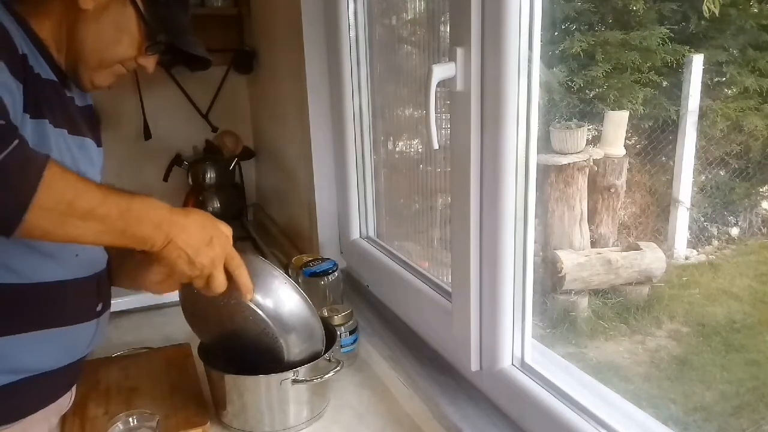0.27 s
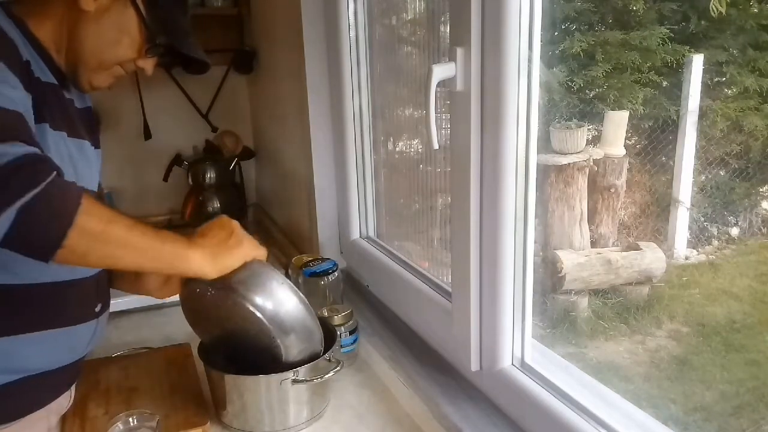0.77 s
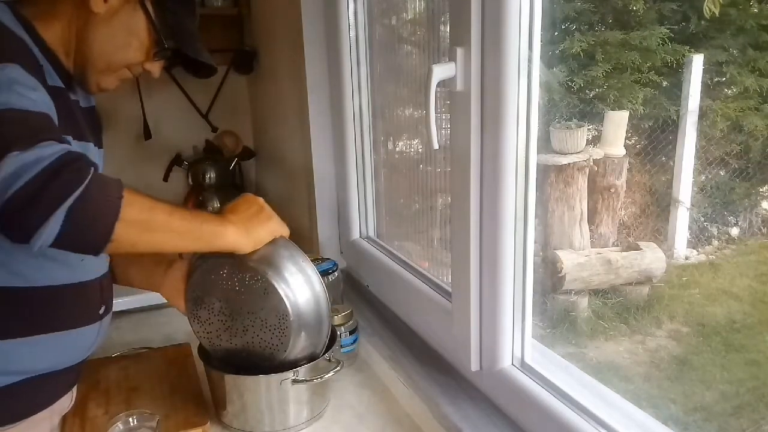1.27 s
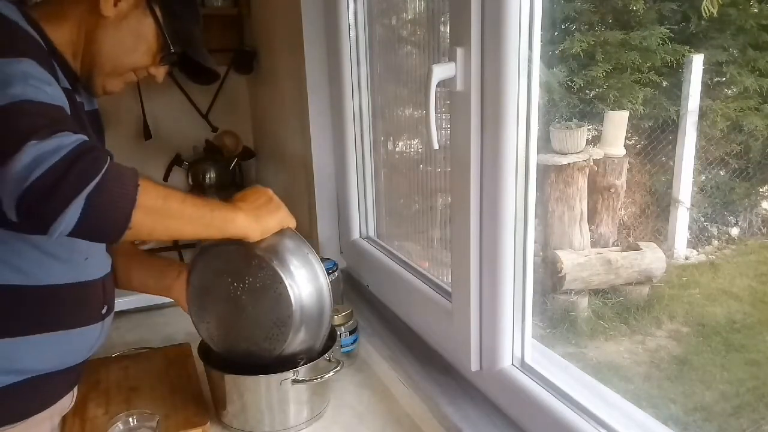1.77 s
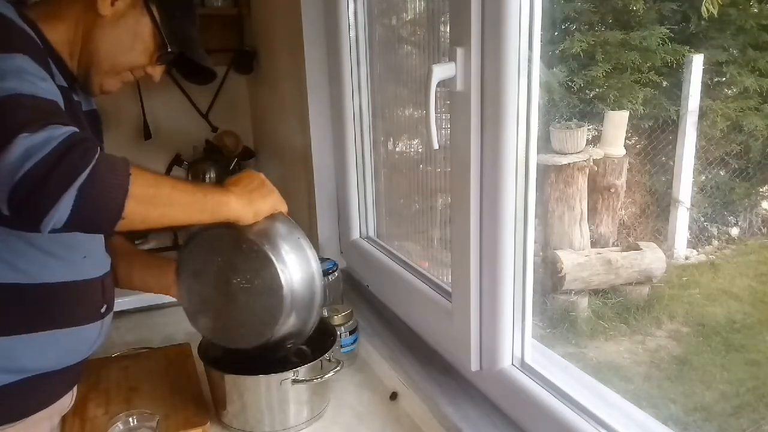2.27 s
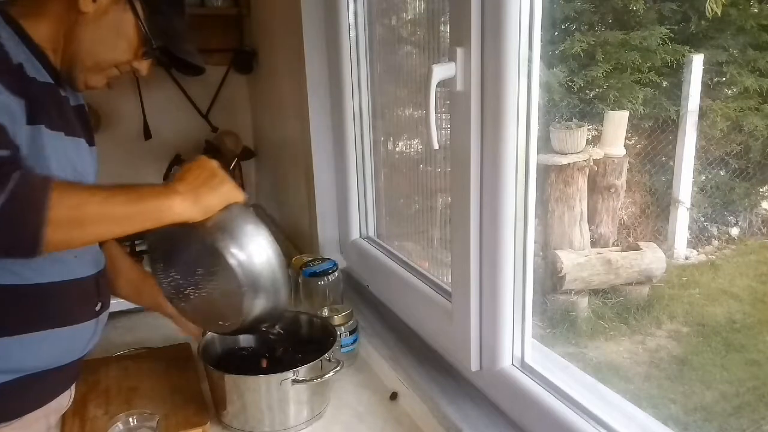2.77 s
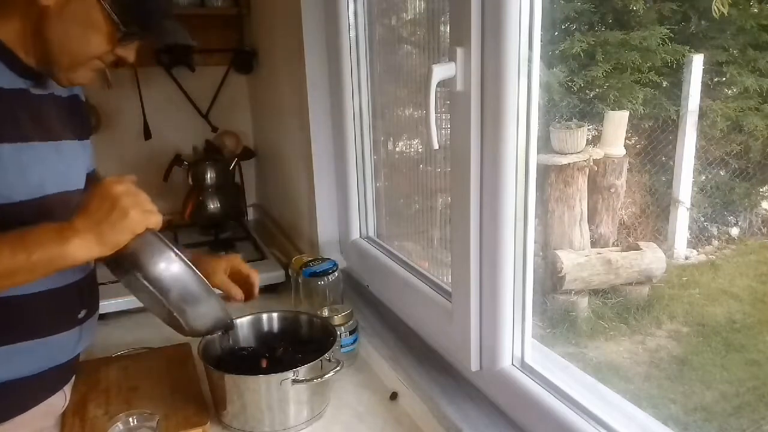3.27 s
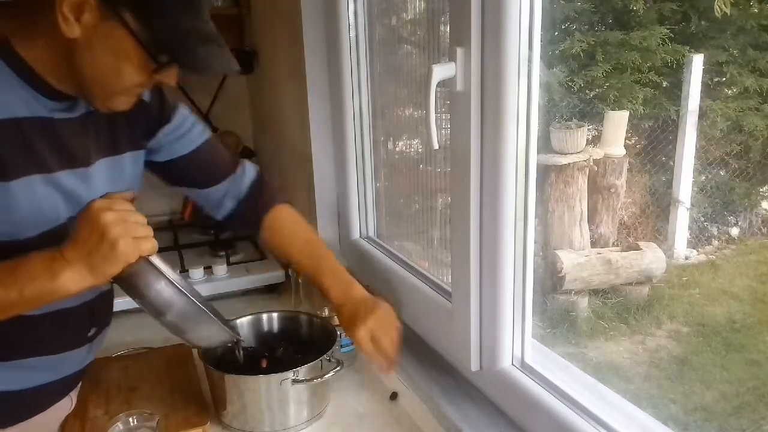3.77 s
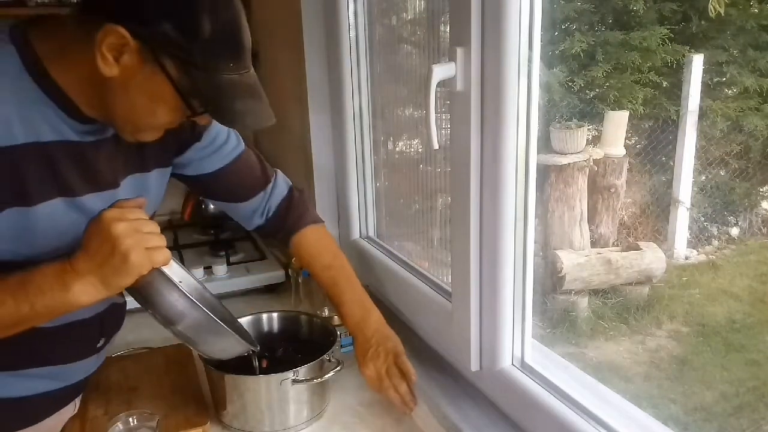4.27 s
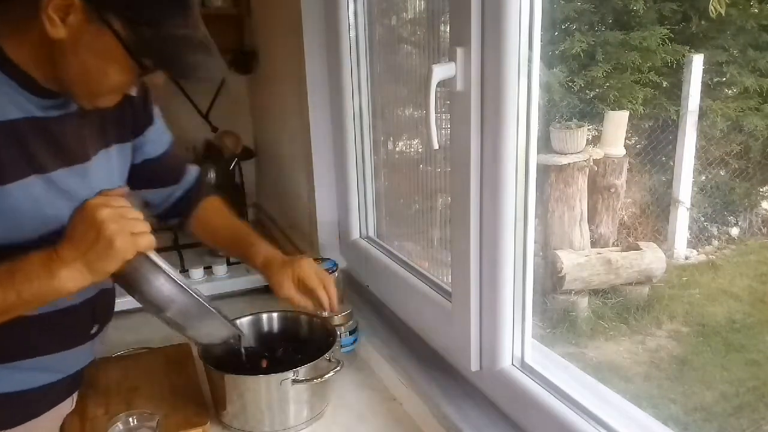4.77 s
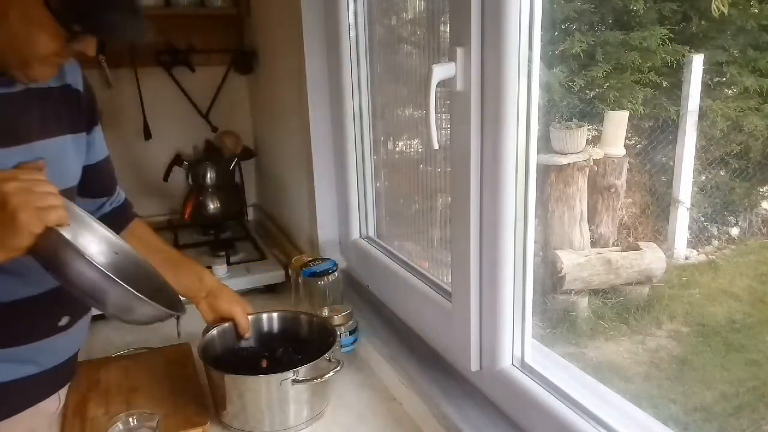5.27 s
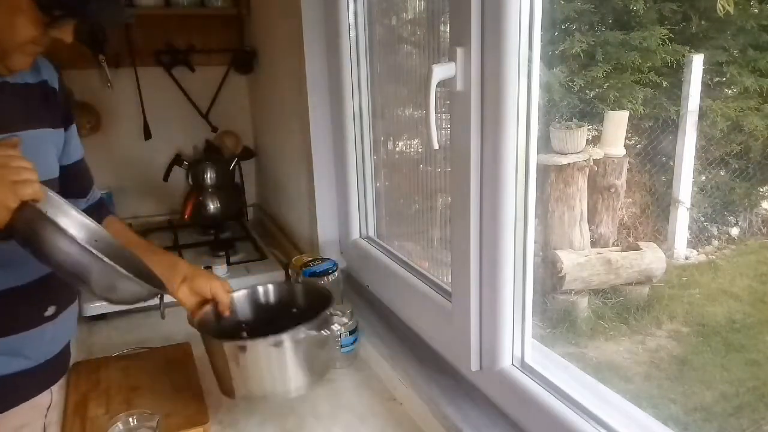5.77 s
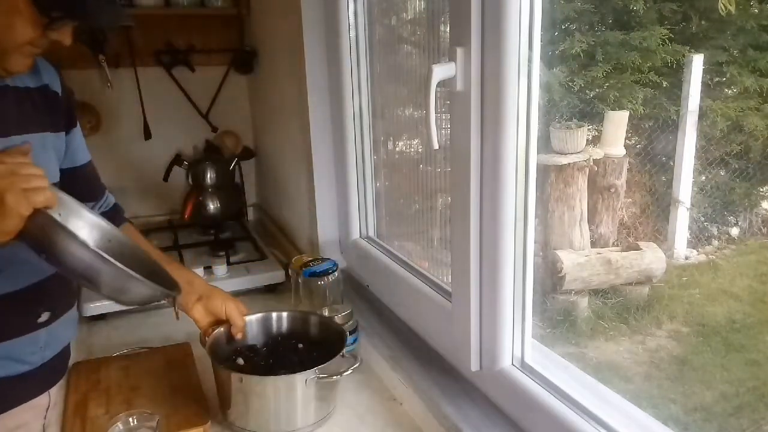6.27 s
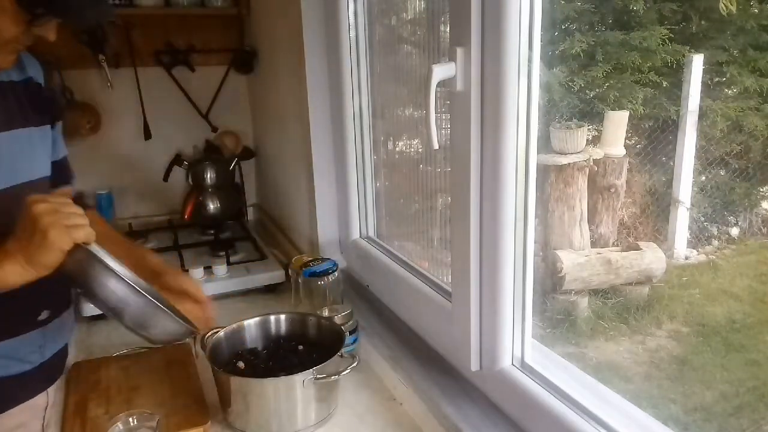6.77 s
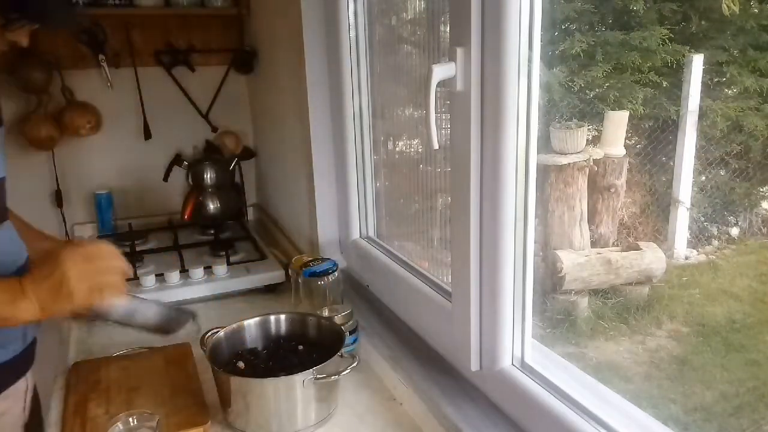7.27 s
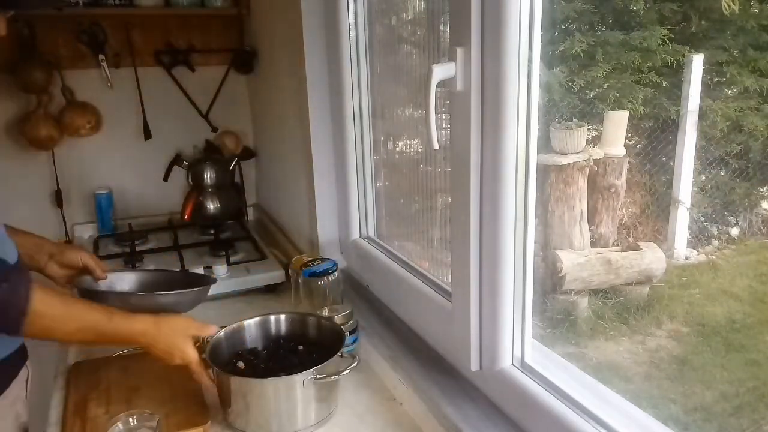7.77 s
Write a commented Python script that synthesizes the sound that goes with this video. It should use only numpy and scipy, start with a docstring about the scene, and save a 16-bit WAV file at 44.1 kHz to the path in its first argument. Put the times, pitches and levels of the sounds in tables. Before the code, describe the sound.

Close single-channel kitchen sound with short room reverberation. Dull metal knocks and a rough groaning scrape accompany soft fruit tumbling into a pot. Quick clusters of bright clanging taps follow, the last ringing out. Near-quiet with tiny pings, then a solid low thump of a full pot and another group of thumps on the counter, light steel jingles and soft handling over a thin hiss.

```python
"""Berries are tipped from a steel bowl into a cooking pot in a small kitchen.
The full bowl knocks and scrapes on the pot rim, as damped impacts and stick-slip, while fruit patters down
as random grains; emptied, it is tapped on the rim and rings in decaying modes. Its loose hanging ring
tinkles with short modes, and later the heavy pot is bumped and set down on the counter as noise bursts
with low modes. Soft bumps and brushed steel accompany the handling; a faint hiss and whine run throughout."""
import sys
import numpy as np
from scipy import signal
from scipy.fft import rfft, irfft
from scipy.io import wavfile
from scipy.ndimage import uniform_filter1d

SR = 44100
rng = np.random.default_rng(int(sys.argv[2]) if len(sys.argv) > 2 else 0)


def generate_wav(sig):
    """Save sig (samples, or channels by samples) to the path in sys.argv[1] as 16-bit PCM at SR."""
    pcm = np.round(np.clip(np.atleast_2d(sig).T, -1, 1) * 32767).astype(np.int16)
    wavfile.write(sys.argv[1], SR, pcm)


N = 353946
SIZE = 49152  # length of every response [samples]
AGE = np.arange(SIZE) / SR  # time since a contact [s]
TIME = np.arange(N) / SR  # time in the scene [s]

# full bowl against the pot rim: (time [s], level [dB], brightness [dB per octave])
KNOCK_EVENTS = [(0.151, -5.5, 0.5), (0.314, 4, 3), (0.413, 4.5, 3.5), (0.432, 2, -1.5), (1.193, -2.5, 1.5),
                (1.249, -4.5, 1), (1.32, -15, 5.5), (1.423, -13, 0.5), (1.558, -15, 3), (1.927, 0.5, 6)]
# broad resonances of bowl on rim: (centre [Hz], width [Hz], lift [dB])
RIM_RESONANCES = [(594, 170, 10), (684, 61, -8), (1452, 69, 8.5), (1952, 72, 7), (2227, 810, 5.5),
                  (2612, 130, 8.5)]
# spectrum of the rubbed pot rim: (frequency [Hz], level [dB])
RIM_SPECTRUM = [(120, -61), (200, -41.5), (415, -12), (453, -22.5), (624, -18), (694, -20.5), (1360, -0.5),
                (1690, -12.5), (2680, -9.5), (3500, -18.5), (4110, -19.5), (14000, -65)]
# modes of the bowl: (frequency [Hz], mean level [dB], nominal 60 dB decay time [s])
STEEL_MODES = [(589, -15, 1.2), (818, -15, 1.0), (1109, -11, 1.3), (1437, -13, .9), (1771, -14, .9),
               (1816, -4, 1.1), (1931, 0, .65), (1996, 0, .4), (2044, 1, .45), (2143, -6, .45),
               (2243, -7, 1.0), (2322, -3, .7), (2660, -6, .9), (2701, 4, .9), (3297, -8, .9),
               (3690, -10, .7), (4230, -5, .5), (4404, -3, .35), (4953, -7, .4), (5545, -2, .35),
               (5792, -2, .25), (6212, -5, .35)]
# pot and bowl are handled: (start [s], length [s], shifting fruit [dB], brushed steel [dB])
HANDLING_MOVES = [(3.779, .03, -64.5, -84), (5.037, 0.075, -60, -63), (5.412, 0.12, -48, -60.5),
                  (5.84, 0.29, -70.5, -61.5), (7.064, 0.28, -72.5, -65), (7.701, 0.038, -59.5, -61.5),
                  (7.92, .11, -70, -73)]


def undb(db):
    """Convert a level in decibels to an amplitude ratio."""
    return 10 ** (np.asarray(db) / 20)


def curve(rows, column=1):
    """Interpolate one column of a control table linearly over time."""
    rows = np.asarray(rows)
    return np.interp(TIME, rows[:, 0], rows[:, column])


def unit(x):
    """Normalize a signal to an energy of one."""
    return x / np.sqrt(np.sum(x ** 2))


def add(out, s, x):
    """Superpose x on out from time s."""
    start = int(max(s, 0) * SR)
    out[start:start + len(x)] += x[:N - start]


def through(x, response):
    """Filter a sound by convolution with an impulse response."""
    return signal.fftconvolve(x, response)[:len(x)]


def colour(points, peaks=(), tilt_db=0, pivot_hz=2000, fine=0):
    """Minimum-phase response of a body: smooth spectrum, broad resonances, tilt and fine ripple."""
    hz = np.maximum(np.fft.rfftfreq(SIZE, 1 / SR), 10)
    at, db = np.transpose(points)
    db = np.interp(np.log(hz), np.log(at), db)
    # the tilt levels off one octave below and two octaves above the pivot
    db = db + tilt_db * np.clip(np.log2(hz / pivot_hz), -1, 2)
    db = db + fine * hz / (hz + 800)  # modes crowd towards the treble
    for centre, width, lift in peaks:
        db = db + lift / (1 + (2 * (hz - centre) / width) ** 2)
    # folding the cepstrum onto positive times makes the response causal
    cepstrum = irfft(db * np.log(10) / 20)
    cepstrum[1:] *= 2
    cepstrum[SIZE // 2:] = 0
    return unit(irfft(np.exp(rfft(cepstrum))))


def ripple(width_hz, depth_db):
    """Modal overlap: fine random peaks and notches left by the crowded modes of one object."""
    count = max(int(width_hz * SIZE / SR), 1)
    wave = rng.standard_normal(SIZE // 2 + 1)
    wave = uniform_filter1d(uniform_filter1d(wave, count), count)
    return depth_db * wave / wave.std()


def burst(t60):
    """Dense flurry of reflections: noise under an exponential decay of 60 dB in t60 seconds."""
    return unit(rng.standard_normal(SIZE) * np.exp(-np.log(1000) * AGE / max(t60, 1 / SR)))


def kitchen():
    """Diffuse reverberation from one spot: noise bands decay separately, the bass longest."""
    # decay of the room: (frequency [Hz], 60 dB decay time [s])
    room_decay = [(60, 0.99), (160, .6), (420, 0.47), (1100, 0.45), (2900, 0.36), (6000, 0.45),
                  (14000, 0.2)]
    hz = np.log(np.fft.rfftfreq(SIZE, 1 / SR) + 1)
    at, t60 = np.transpose(room_decay)
    noise = rfft(rng.standard_normal(SIZE))
    bands = irfft([noise * np.interp(hz, np.log(at), share) for share in np.eye(len(at))])
    tail = np.sum(bands * np.exp(-np.log(1000) * AGE / t60[:, None]), axis=0)
    return unit(tail * (1 - np.exp(-AGE / 0.001)))


def ring(modes, push_s, scatter_db=2):
    """Modal superposition: decaying sines swell over the push; each contact shares the energy differently."""
    hz, db, t60 = np.transpose(modes)[:, :, None]
    size = undb(db + scatter_db * rng.standard_normal(hz.shape))
    phase = 2 * np.pi * (hz * AGE + rng.random(hz.shape))
    swell = 1 - np.exp(-(AGE / push_s) ** 2)
    return unit(swell * np.sum(size * np.sin(phase) * np.exp(-np.log(1000) * AGE / t60), axis=0))


def blow(body, crack_s, room_db, click_db):
    """Impact excitation: first contact, shudder of the wall and room reflections, filtered by the body."""
    push = burst(crack_s) + undb(room_db) * kitchen()
    push[0] += undb(click_db)
    return unit(through(push, body))


def grains(per_s, spread_db):
    """Shot noise: random small impacts of uneven size and sign, rms one."""
    hit = rng.random(N) < per_s / SR
    size = undb(spread_db * np.clip(rng.standard_normal(N), -2, 2)) * rng.choice([-1, 1], N)
    return unit(hit * size) * np.sqrt(N)


def stroke(start, length):
    """Envelope of one movement: exponential swell, hold and exponential fade."""
    swell_db_per_s, fade_db_per_s = 348, 246.5
    before = np.maximum(start - TIME, 0)
    after = np.maximum(TIME - start - length, 0)
    return undb(-swell_db_per_s * before - fade_db_per_s * after)


def gesture(rows):
    """Envelope along a level curve, with an exponential swell before it and fade after it."""
    return undb(curve(rows)) * stroke(rows[0][0], rows[-1][0] - rows[0][0])


def aftermath(events, fall_db_per_s, delay_s=0):
    """Exponential relaxation: the stir after each blow starts in proportion to its strength."""
    out = np.zeros(N)
    for s, db, *_ in events:
        add(out, s + delay_s, undb(db - fall_db_per_s * AGE))
    return out


def knocks():
    """Damped impact: the fruit still loads the bowl, so it knocks with little modal ring."""
    # spectrum of the full bowl: (frequency [Hz], level [dB])
    full_bowl = [(88, -37.5), (150, -21.5), (291, -6.5), (361, -15), (534, -4.5), (716, -15), (1290, -0.5),
                 (1790, -12), (2650, -5), (2980, -13), (6390, -27), (8070, -40.5), (15100, -59.5),
                 (16000, -54.5)]
    out = np.zeros(N)
    fine = ripple(width_hz=40, depth_db=2.5)
    for s, db, tilt in KNOCK_EVENTS:
        body = colour(full_bowl, RIM_RESONANCES, tilt, fine=fine)
        hit = blow(body, crack_s=0.075, room_db=-1, click_db=-18)
        add(out, s, undb(db) * (hit + undb(-23.5) * ring(STEEL_MODES, push_s=0.00059)))
    return out


def catches():
    """Stick phase of friction: the sliding noise stalls just before the rim jumps and knocks."""
    catch_db, catch_s = -13, .035  # depth and length of the lull
    stall = sum(np.exp(-(2 * (TIME - s) / catch_s + 1) ** 4) for s, *_ in KNOCK_EVENTS)
    return undb(catch_db * stall)


def scrape():
    """Stick-slip friction: random slips along the pot rim excite its resonances."""
    # the long drag: (time [s], level before the drag gain [dB], treble control [dB])
    drag = [(0.9, -62.5, -3), (1.028, -31, -2.5), (1.11, -35, -2), (1.342, -37, -12), (1.546, -58.5, 0),
            (1.556, -48.5, -8), (1.642, -55, -2), (1.652, -53.5, 3), (1.9, -63, -0.5)]
    # brief rubs of rim on rim as the grip changes: (start [s], length [s], level [dB])
    rubs = [(0, 0.01, -53), (0.133, 0.056, -45.5), (0.586, 0.039, -46.5), (0.835, 0.0075, -45),
            (0.979, 0.026, -36.5), (1.832, .025, -52)]
    drag_db = -0.5
    # colour is neutral at this treble control; dB of brightening for each dB above it
    neutral_treble_db, brightening = -2, 2.54
    pressure = undb(drag_db) * gesture(drag)
    pressure = pressure + sum(undb(db) * stroke(s, length) for s, length, db in rubs)
    slips = grains(per_s=450, spread_db=4) * pressure * catches()
    fine = ripple(width_hz=35, depth_db=3)
    rim = colour(RIM_SPECTRUM, RIM_RESONANCES, fine=fine)
    rubbed = through(slips, blow(rim, crack_s=.012, room_db=-1, click_db=0))
    # where the treble control is low, a broad resonance at 1220 Hz groans
    groaning = colour(RIM_SPECTRUM, [(1220, 240, 16)], fine=fine)
    groan = through(slips, blow(groaning, crack_s=.012, room_db=-2, click_db=0))
    low = signal.sosfiltfilt(signal.butter(2, 1650, fs=SR, output="sos"), rubbed)
    high = rubbed - low
    bright = undb(brightening * (curve(drag, column=2) - neutral_treble_db))
    return low / np.maximum(bright, 1) ** 2 + high * bright + 1.29 * np.maximum(1 - bright, 0) * groan


def berries():
    """Shot noise of soft fruit on the heap: a pour, a clump after each knock, a shift with each handling."""
    # flow of fruit into the pot: (time [s], level before the pour gain [dB])
    pour = [(0.0, -50), (0.47, -51), (0.74, -59), (1.05, -53), (1.89, -48), (1.93, -43.5), (2.34, -58),
            (2.75, -50.5), (3.1, -91)]
    # spectrum of fruit landing: (frequency [Hz], level [dB])
    fruit = [(15, -63.5), (25, -38), (102, 1.5), (244, -10), (301, 0.5), (345, -11), (407, -3), (452, -11),
             (557, -5), (752, -17.5), (900, -11.5), (1170, -42.5), (1980, -120)]
    pour_db = -3
    # each knock shakes a clump loose: level against the knock, time to land, fall
    clump_db, drop_s, clump_fall_db_per_s = -46.5, .014, 300.5
    clumps = undb(clump_db) * aftermath(KNOCK_EVENTS, clump_fall_db_per_s, drop_s)
    shifts = sum(undb(db) * stroke(s, length) for s, length, db, _ in HANDLING_MOVES)
    flow = undb(pour_db) * gesture(pour) + clumps + shifts
    landings = grains(per_s=200, spread_db=3) * flow
    return through(landings, blow(colour(fruit), crack_s=0.012, room_db=-1.0, click_db=-1.0))


def clanks():
    """Modal ringing with beats: the emptied bowl is tapped, its decay kept short until it rings out."""
    # taps on the rim: (time [s], level [dB], brightness [dB per octave], ring against the blow [dB])
    taps = [(2.142, -0.5, 2, -5.5), (2.158, 4.5, -1.5, -9), (2.162, 11.5, 1, -12.5), (2.415, -1.5, 0, -8.5),
            (2.532, 9, 1, -3), (2.548, 5.5, 1.5, -13.5), (2.561, 10.5, 1.5, -11.5), (2.678, 1, 3.5, 0),
            (2.769, -0.5, 0.5, -1)]
    # spectrum of the empty bowl: (frequency [Hz], level [dB])
    empty_bowl = [(88, -55.5), (150, -34), (578, -14), (689, -19), (1340, -3.5), (1530, -11), (1980, -1.5),
                  (2220, -9.5), (3700, -11), (4080, -10.5), (5680, -9), (10200, -29.5), (13400, -34),
                  (14800, -17.5), (16000, -31.5)]
    # its broad resonances: (centre [Hz], width [Hz], lift [dB])
    resonances = [(2020, 590, 5.7), (3900, 230, 4.5), (4477, 58, 5.7), (5480, 330, 2.6), (6290, 210, 9.8),
                  (14990, 760, 7.2)]
    release_s = 2.6  # from this time on the bowl rings out long
    # from this strength the pot rim clacks fully; its level against the blow
    hard_blow_db, clack_db = 1.5, -10.5
    out = np.zeros(N)
    fine = ripple(width_hz=40, depth_db=2.6)
    rim = colour(RIM_SPECTRUM, [(1800, 350, 6.6), (3464, 1100, 14)], tilt_db=6.5)
    for s, db, tilt, ring_db in taps:
        body = colour(empty_bowl, resonances, tilt, fine=fine)
        hit = blow(body, crack_s=.018, room_db=2, click_db=-18)
        modes = np.array(STEEL_MODES) * [1, 1, 1.15 if s > release_s else .45]
        # the bowl is not quite round, so each mode beats with a weaker twin
        twin = ring(modes * [1.0025, 1, 1], push_s=.001)
        rung = ring(modes, push_s=.001) + .45 * twin
        # hard blows also drive the pot rim, which clacks briefly
        clack_gain = undb(min(db - hard_blow_db, 0) * .5 + clack_db)
        clack = clack_gain * unit(through(burst(.024), rim))
        add(out, s, undb(db) * (hit + clack + undb(ring_db) * rung))
    return out


def tinkles():
    """Light-body impact: the hanging ring pings on the bowl and jiggles to rest, with bright ticks."""
    # hanging ring against the bowl: (time [s], ping [dB], bright tick [dB])
    contacts = [(2.0537, -10.5, -11), (2.0842, -11, -8), (2.3416, -9.5, -1.5), (2.3815, -8, -4.5),
                (2.4942, -11, -2), (3.015, -8, -8.5), (3.4645, -29.5, -45), (3.5618, -21.5, -34.5),
                (3.6576, -29, -46), (3.7673, -33.5, -40), (3.895, -35, -50), (5.2475, -22, -38),
                (5.4854, -19, -41), (5.6484, -15.5, -17), (5.7219, -13, -20.5), (5.9379, -18.5, -35),
                (6.0057, -11, -15.5), (6.1134, -24, -11.5), (6.2013, -21, -57), (7.0748, -27.5, -38),
                (7.1516, -21.5, -21), (7.2439, -19, -26.5), (7.3634, -25, -39), (7.4724, -18.5, -24.5),
                (7.9434, -56, -28.5)]
    # short modes of the ring: (frequency [Hz], mean level [dB], 60 dB decay time [s])
    ping_modes = [(1773, -12, 0.0043), (1908, -5, 0.098), (2025, 4.5, 0.062), (2190, -4, 0.054),
                  (2377, -8, 0.042), (2483, -9, .04)]
    # spectrum of the tick: (frequency [Hz], level [dB])
    tick_spectrum = [(300, -23.5), (900, -19), (1300, -11.5), (2050, -14), (2800, -8), (3500, -16.5),
                     (4600, -7), (6000, -7), (7200, -22), (9500, -30.5), (12500, -47), (15300, -26.5)]
    # broad resonances of the tick: (centre [Hz], width [Hz], lift [dB])
    resonances = [(5000, 250, 5.5), (5700, 200, 6.5), (6135, 180, 3.3)]
    # after each contact the ring jiggles on: level against the ping, fall
    jiggle_db, jiggle_fall_db_per_s = -45.5, 170
    body = colour(tick_spectrum, resonances, fine=ripple(width_hz=45, depth_db=3))
    stir = undb(jiggle_db) * aftermath(contacts, jiggle_fall_db_per_s)
    jiggle = grains(per_s=130, spread_db=3) * stir
    jiggled = ring(ping_modes, push_s=0.0018)
    out = through(jiggle, blow(jiggled, crack_s=0.0054, room_db=0.5, click_db=-1))
    for s, ping_db, tick_db in contacts:
        ping = blow(ring(ping_modes, push_s=0.00068), crack_s=0.013, room_db=0.5, click_db=-2)
        tick = blow(body, crack_s=0.098, room_db=-2.0, click_db=-17.0)
        tick = tick + undb(-15) * ring(STEEL_MODES, push_s=0.0009)
        add(out, s, undb(ping_db) * ping + undb(tick_db) * tick)
    return out


def thuds():
    """Heavy impact on a resonant plate: the pot lands and rocks; the spot picks the strongest resonance."""
    # pot on the counter: (time [s], level [dB], brightness [dB per octave], rocking time [s],
    # strongest resonance [Hz], edge clack [dB])
    landings = [(5.011, -14, -11, 0.11, 308, -30), (5.552, 15, 1, 0.049, 384, -4),
                (6.373, 14.5, 1.5, 0.2, 460, -21.5), (6.551, 12.5, 3, 0.045, 562, -39),
                (6.589, 10, -2.5, 0.16, 590, -40)]
    # spectrum of the counter: (frequency [Hz], level [dB])
    counter = [(15, -60), (25, -9), (48, -25.5), (117, 4.5), (199, -11.5), (382, 5.5), (442, -6.5),
               (576, 2), (682, -5), (911, -6.5), (1000, -6), (1410, -9.5), (3700, -43.5), (5850, -86.5),
               (8000, -65), (10400, -118.5), (17600, -120)]
    # its broad resonances: (centre [Hz], width [Hz], lift [dB])
    resonances = [(125, 9.5, 4), (192, 44, 8.2), (740, 68, 0.5), (910, 87, 4.5)]
    # modes of the loaded pot: (frequency [Hz], mean level [dB], 60 dB decay time [s])
    pot_modes = [(106, -26, .5), (123.6, 1, .6), (166.8, 6.5, 0.59), (289, -2.5, 0.57), (343, -7, 0.47),
                 (378, 14.5, 0.3), (450, 8.5, 0.47), (567, 15, 0.23), (976, -7, 0.305)]
    # spectrum of the hard edge of the pot base: (frequency [Hz], level [dB])
    base_edge = [(1200, -31.5), (2400, 9), (3000, -2), (3600, -7.5), (4500, -20), (6200, -16), (7500, -36),
                 (16000, -59)]
    out = np.zeros(N)
    fine = ripple(width_hz=25, depth_db=2)
    edge = colour(base_edge)
    for s, db, tilt, rock_s, hz, edge_db in landings:
        body = colour(counter, resonances + [(hz, 70, 7)], tilt, pivot_hz=500, fine=fine)
        hit = blow(body, crack_s=rock_s, room_db=4.0, click_db=-5.5)
        add(out, s, undb(db) * (hit + undb(-9.0) * ring(pot_modes, push_s=0.022)))
        add(out, s, undb(edge_db) * blow(edge, crack_s=.03, room_db=0.5, click_db=-4.5))
    return out


def bumps():
    """Damped single resonance: soft contacts of fruit and hands each wake one mode."""
    # soft bumps: (time [s], level [dB], pitch [Hz])
    contacts = [(0.265, -14.5, 273), (1.473, -17, 409), (1.521, -17, 301), (1.951, -12.5, 164),
                (2.017, -18, 292), (3.815, -26.5, 300), (5.063, -25, 304), (7.945, -29, 1177),
                (7.983, -31.5, 1050)]
    out = np.zeros(N)
    for s, db, hz in contacts:
        body = ring([(hz, 0, 10 / hz)], push_s=0.0069)  # falls 60 dB in ten cycles
        add(out, s, undb(db) * blow(body, crack_s=0.024, room_db=-0.5, click_db=-2))
    return out


def handling():
    """Sliding friction: hands and counter brush the steel in fine random slips."""
    # spectrum of steel under the hand: (frequency [Hz], level [dB])
    brushed = [(200, -23.5), (900, -14.5), (1500, -1), (2250, 3.5), (3200, -10.5), (5800, -8), (8000, -30),
               (16000, -48)]
    pressure = sum(undb(db) * stroke(s, length) for s, length, _, db in HANDLING_MOVES)
    slips = grains(per_s=400, spread_db=4) * pressure
    body = colour(brushed, fine=ripple(width_hz=45, depth_db=3))
    return through(slips, blow(body, crack_s=0.0092, room_db=-1.5, click_db=-2))


def hiss():
    """Stationary filtered noise with a thin, randomly frequency-modulated high whine."""
    # spectrum of the background: (frequency [Hz], level [dB])
    quiet = [(25, -18.5), (60, -11.5), (110, -0.5), (170, -1.5), (330, -8.5), (900, -13), (2000, -18),
             (5000, -18), (6700, -18), (7300, -27), (8200, -33.5), (13500, -35), (15500, -26.5)]
    # broad resonance of the background: (centre [Hz], width [Hz], lift [dB])
    resonances = [(15300, 700, 7.1)]
    noise_db, whine_db, whine_hz = -66.5, -77.5, 7580
    waver = uniform_filter1d(rng.standard_normal(N), 400)
    pitch = whine_hz + 35 * waver / waver.std()  # wavers by 35 Hz rms
    whine = np.sqrt(2) * np.sin(2 * np.pi * np.cumsum(pitch) / SR)
    noise = through(rng.standard_normal(N), colour(quiet, resonances))
    return undb(noise_db) * noise + undb(whine_db) * whine


def scene():
    """Linear superposition of all sources in one channel."""
    bowl = knocks() + scrape() + clanks() + tinkles()
    pot_and_fruit = thuds() + bumps() + berries()
    return (bowl + pot_and_fruit + handling() + hiss())[None]


def record(dry):
    """Band limiting: a steep elliptic low-pass cuts the top."""
    top_hz = 15800
    return signal.sosfilt(signal.ellip(10, .2, 80, top_hz, fs=SR, output="sos"), dry)


dry = scene()
out = record(dry)
generate_wav(out)
```